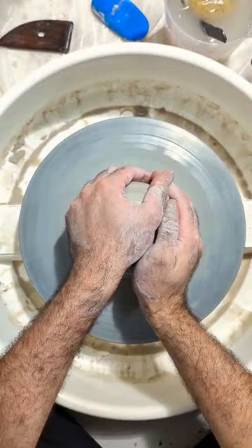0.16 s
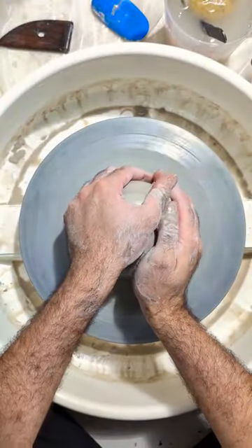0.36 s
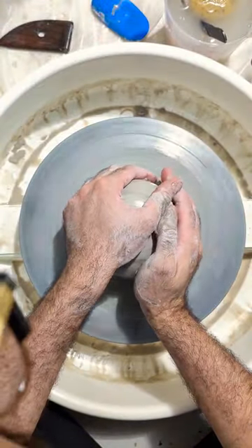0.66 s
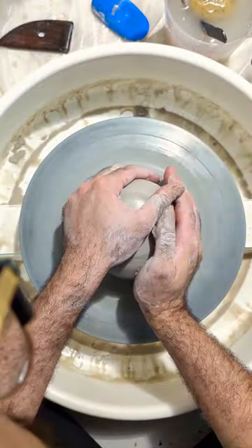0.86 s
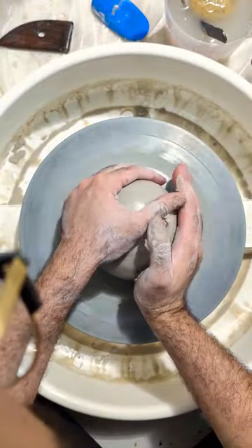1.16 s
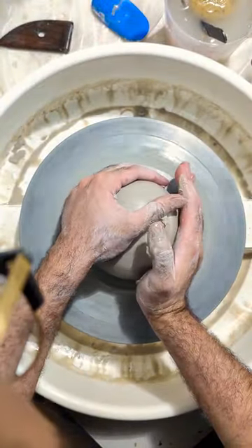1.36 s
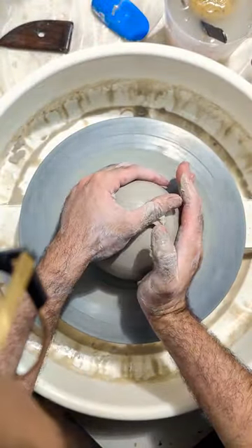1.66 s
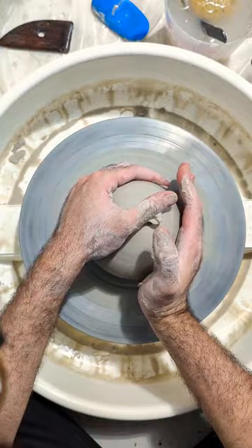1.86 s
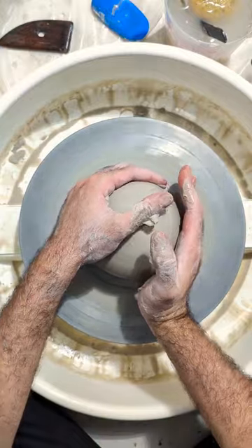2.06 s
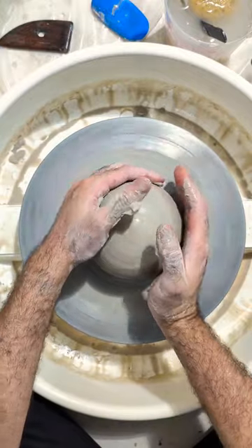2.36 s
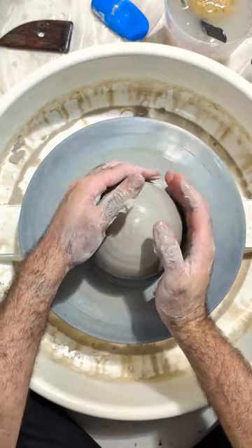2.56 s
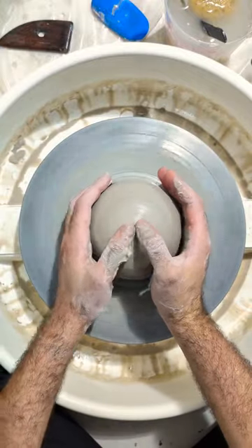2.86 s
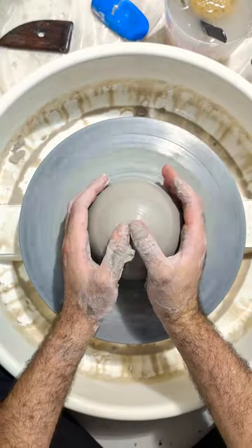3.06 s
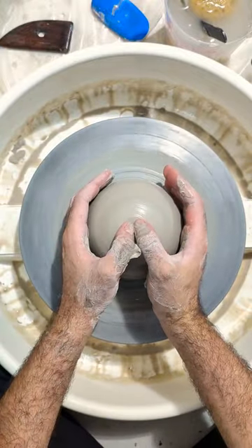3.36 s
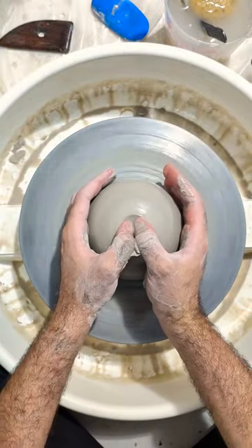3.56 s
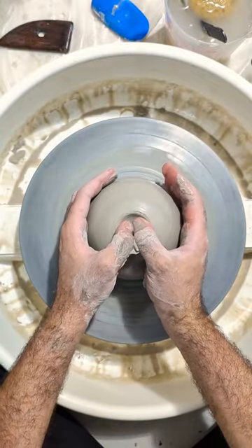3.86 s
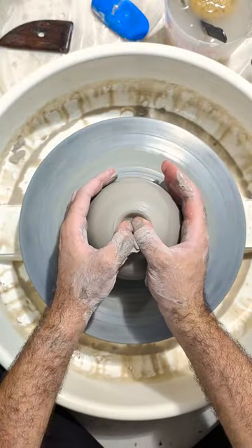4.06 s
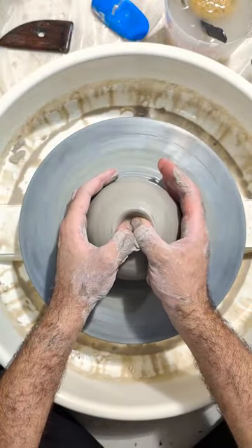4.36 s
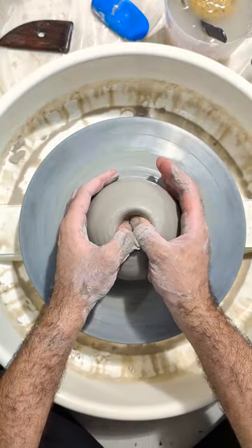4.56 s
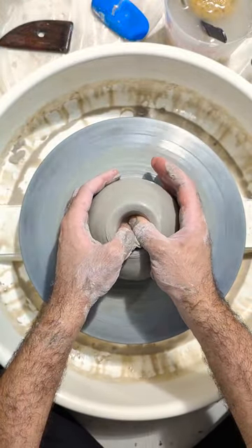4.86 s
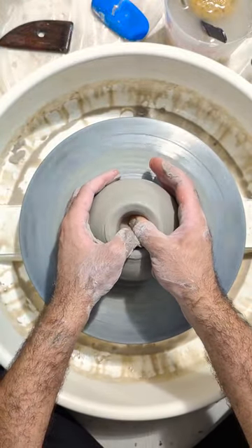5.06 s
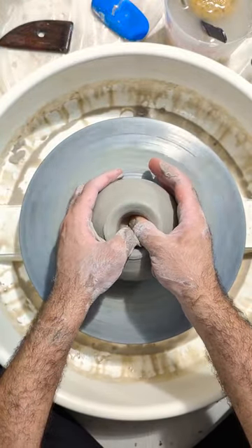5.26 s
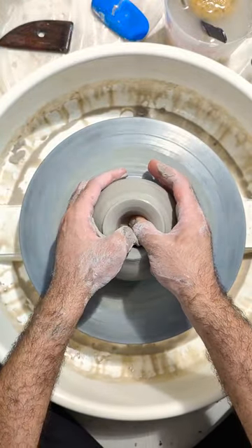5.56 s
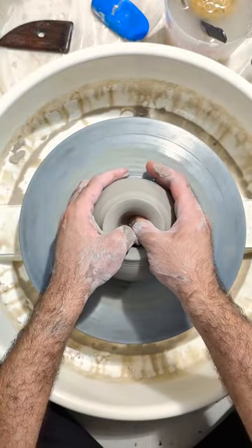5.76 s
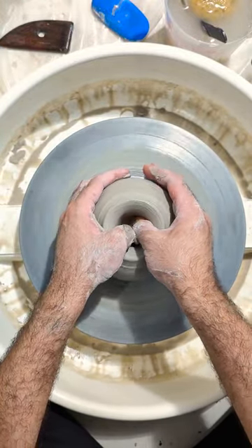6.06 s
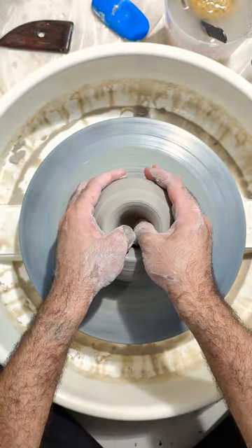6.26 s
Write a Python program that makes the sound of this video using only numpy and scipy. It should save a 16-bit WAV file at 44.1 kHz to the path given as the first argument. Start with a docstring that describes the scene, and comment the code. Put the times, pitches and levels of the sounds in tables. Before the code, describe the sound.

An electric pottery wheel spins up quickly and settles into a steady, nearly pure whine that sags and swells slightly as hands press the clay. A few small wet smacks come at the start. Close by, wet clay hisses faintly under the palms, pulsing with the turning wheel. Near the end the thumbs scrape and chatter softly, with a few more smacks. One microphone beside the wheel also hears a low studio rumble.

```python
"""Wet smacks of palms on clay come first, then an electric pottery wheel spins up and whines on one pitch,
sagging a little as the hands press and swelling as the pitch nears a resonance of its frame.
Close by, clay hisses under the palms and rings the metal wheel head, throbbing with the motor shaft.
Later the thumbs squeak and chatter. The sounds of the hands bounce around the splash pan, and
behind it all the one microphone hears the low rumble of the drive and the studio."""
import sys
import numpy as np
from scipy import signal
from scipy.fft import rfft, irfft
from scipy.io import wavfile
from scipy.ndimage import uniform_filter1d

SR = 44100
rng = np.random.default_rng(int(sys.argv[2]) if len(sys.argv) > 2 else 0)


def wav_record(signal):
    """Record a signal, one row per channel, as 16-bit PCM in the file named by sys.argv[1]."""
    frames = np.transpose(np.atleast_2d(signal))
    bounded = np.clip(frames, -1, 1)
    # unit amplitude maps onto the largest positive 16-bit level
    quanta = np.round(bounded * 32767).astype(np.int16)
    wavfile.write(sys.argv[1], SR, quanta)


N = 283298
TIME = np.arange(N) / SR
FREQ = np.fft.rfftfreq(N, 1 / SR)
SLOTS = 17  # armature slots: cycles of the whine per turn of the shaft
START_S, REACH_S = 0.288, 0.4  # the whine comes in; the wheel reaches working speed


# resonances of the frame near the whine: (f/Hz, width/Hz, tone level/dB)
FRAME_MODES = [(435.6, 15, -49), (330, 20, -59)]
# low tones of shaft and belt: (multiple of the shaft speed, level/dB re the median whine)
SHAFT_ORDERS = [(0.88, -14), (1.53, -24), (3.049, -20.5)]

def motor(turns, pitch_hz, third_db, flutter_db=0.63):
    """At the wheel, the armature slots sing one nearly pure tone; shaft and belt add weak low orders."""
    level_db = frame_swell(pitch_hz, FRAME_MODES, base_db=-62)
    slot_phase = 2 * np.pi * SLOTS * turns
    whine = np.sin(slot_phase) * amp(level_db + flutter_db * wander(33))
    third = np.sin(3 * slot_phase) * amp(third_db + 2 * wander(4.5))
    hum = shaft_tones(turns, SHAFT_ORDERS) * amp(np.median(level_db))
    running = np.clip(TIME / REACH_S, 0, 1) ** 4
    return np.sqrt(2) * (whine + running * third) + running * hum


# resonance of the frame that the octave meets at top speed: (f/Hz, width/Hz, tone level/dB)
UPPER_FRAME_MODE = [(889, 9, -76.5)]

def motor_octave(turns, pitch_hz, waver_db=3):
    """The weak, wavering second harmonic of the whine."""
    level_db = frame_swell(2 * pitch_hz, UPPER_FRAME_MODE, base_db=-97) + waver_db * wander(4.6)
    return np.sqrt(2) * amp(level_db) * np.sin(2 * np.pi * 2 * SLOTS * turns)


# pitch of the whine under the hands: (t/s, f/Hz)
WORKING_PITCH = [(0.44, 431.6), (0.6, 434.2), (0.72, 428.5), (1.08, 422.4), (1.87, 422.5), (2.2, 430.4),
                 (2.52, 440.8), (2.75, 442.3), (3.16, 438.2), (4.1, 435.7), (4.66, 428.9), (4.8, 433.7),
                 (4.96, 429.6), (5.8, 427.8), (6.1, 425.1), (6.4, 426)]

def motor_pitch(climb_hz_per_s=1100, round_s=0.012):
    """Pitch of the whine in Hz: an even climb that rounds into the working speed."""
    working_hz, = curves(WORKING_PITCH)
    shortfall_hz = climb_hz_per_s * round_s * np.logaddexp(0, (REACH_S - TIME) / round_s)
    return np.maximum(working_hz - shortfall_hz, working_hz / 2)


def frame_swell(tone_hz, modes, base_db, rise_s=0.028):
    """Level of a motor tone in dB: it swells as its pitch nears a resonance of the frame."""
    resonant = sum(amp(db) ** 2 / (1 + (2 * (tone_hz - hz) / width) ** 2) for hz, width, db in modes)
    onset = np.clip((TIME - START_S) / rise_s, .05, 1)
    return 10 * np.log10((amp(base_db) ** 2 + resonant) * onset ** 2)


# spells in which the drive turns harsh: (t/s, half length/s, third harmonic rise/dB, rattle rise/dB)
HARSH_SPELLS = [(0.598, 0.073, 7, 2.5), (2.26, 0.05, 16, -2.5), (2.657, 0.11, 14, 1.5),
                (2.934, 0.1, -3, 5.5), (5.125, 0.073, 12, 4.5), (5.636, 0.08, 14, 5),
                (5.833, 0.11, 12.5, 4)]

def strain(press_db, cold_db=10.5, settle_s=1.14):
    """Rattle and third harmonic in dB: starting and pressure lift the rattle, harsh spells move both."""
    settling = np.minimum(TIME / REACH_S, 1) ** 4 * np.exp(-np.maximum(TIME - REACH_S, 0) / settle_s)
    rattle_db = -77 + cold_db * settling + 0.14 * press_db
    third_db = -93
    for s, half_length, third_rise_db, rattle_rise_db in HARSH_SPELLS:
        spell = np.exp(-((TIME - s) / half_length) ** 2)
        rattle_db += rattle_rise_db * spell
        third_db += third_rise_db * spell
    return rattle_db, third_db


# modes of the housing, shaken by the bearings: (f/Hz, width/Hz, relative level/dB)
HOUSING_MODES = [(410, 620, -9.5), (456.3, 70, 6.5), (642, 130, 2), (801, 73, 1), (911, 164, 0),
                 (1107, 330, -15.5), (1424, 170, -13.5)]
# buzz around the octave of the whine: (multiple of the shaft speed, level/dB re the rattle)
BUZZ_ORDERS = [(32.7, -11.5), (33, -15), (34, -12), (35.5, -18.5)]

def bearings(turns, rattle_db, rolling_db=6, load_share=0.59):
    """Rolling noise and a buzz in the housing grow with the strain on the drive."""
    usual_db = np.median(rattle_db)
    load_db = load_share * (rattle_db - usual_db)
    rolling = ring(noise(), HOUSING_MODES) * amp(usual_db + rolling_db + load_db)
    buzz = shaft_tones(turns, BUZZ_ORDERS) * amp(rattle_db) * (TIME > START_S)
    return rolling + buzz


# hiss under the pressure of each grip, centring the clay and then opening it: (t/s, level/dB)
CENTRING_GRIP = [(0, -102), (0.35, -88.5), (0.89, -70.5), (0.98, -76.5), (1.2, -74.5), (1.29, -69),
                 (1.6, -67), (2.42, -73.5), (2.65, -67.5), (2.73, -80), (2.87, -93)]
OPENING_GRIP = [(2.94, -89.5), (3.03, -79), (3.6, -76), (3.9, -84.5), (5.23, -85.5), (5.31, -74.2),
                (6.04, -73.5), (6.16, -70), (6.25, -78.5), (6.42, -72.5)]

def hand_pressure(usual_hiss_db=-76.5):
    """Pressing harder lifts the hiss: its level, and its excess over ordinary pressure, both in dB."""
    hiss_db, = curves(list(CENTRING_GRIP) + list(OPENING_GRIP))
    return hiss_db, hiss_db - usual_hiss_db


# hiss of wet clay: (f/Hz, relative level/dB per Hz)
SLIP_SPECTRUM = [(300, 2), (1000, -2), (2200, -2.5), (3200, -0.5), (3600, -0.5), (5200, 1), (6300, -1),
                 (7400, -1.5), (8800, 1), (9600, -0.5), (10000, -3.5), (11500, -7), (13500, -11.5),
                 (15500, -16)]
# modes of the metal wheel head: (f/Hz, width/Hz, relative level/dB)
HEAD_MODES = [(2867, 250, -5.5), (3140, 130, -11), (3949, 78, -1), (4800, 150, -7.5), (5420, 62, -13.5),
              (5530, 140, -13.5), (6800, 55, -20), (8400, 130, -14.5), (8860, 330, -12), (9420, 220, -14.5),
              (9590, 170, -14.5), (11050, 80, -24.5)]
# ripple of the drive, shared out to hiss and ring: (multiple of the shaft speed, depth/dB)
DRIVE_RIPPLE = [(0.752, -3), (0.999, 1.5), (1.75, 1.4), (1.998, 1), (2.999, 1.5)]

def clay(turns, hiss_db, drag_db, hiss_throb=0.38, head_throb=0.89, catch_db=2):
    """Close on the palms: sliding hiss and the ring of the wheel head, both pulsing with the drive."""
    ripple_db = sum(db * np.sin(2 * np.pi * (k * turns + rng.random())) for k, db in DRIVE_RIPPLE)
    throb_db = ripple_db + catch_db * np.tanh(wander(9.1))  # the skin also catches at random
    fine_grains = grit(per_s=14000, spread_db=2.5) * amp(hiss_throb * throb_db)
    hiss = wet_film(colour(fine_grains, SLIP_SPECTRUM))
    coarse_grains = grit(per_s=9900, spread_db=8) * amp(head_throb * throb_db)
    return hiss * amp(hiss_db) + ring(coarse_grains, HEAD_MODES) * amp(drag_db)


def drag(press_db, usual_db=-80.5, grab_db=12.5, grab_s=0.081, loosen_s=0.62):
    """Ring of the wheel head in dB: the clay grabs the palms at first and loosens as the slip spreads."""
    start_db = grab_db * np.minimum(TIME / grab_s, 1) * np.exp(-(TIME / loosen_s) ** 2)
    grip_db = np.minimum(0.9 * press_db, 4)  # under firm pressure the skin slides on the slip
    uneven_db = -2.5 * wander(6.5)  # wetter and drier clay passes
    return usual_db + grip_db + start_db + uneven_db


def wet_film(hiss, depth_db=2, patch_cells=6):
    """The colour of the hiss shifts from moment to moment as the wet film breaks and closes."""
    cells = signal.stft(hiss, nperseg=256)[2]
    patches = uniform_filter1d(rng.standard_normal(cells.shape), patch_cells, axis=0)
    patches = unit(uniform_filter1d(patches, patch_cells, axis=1))
    return unit(signal.istft(cells * amp(depth_db * patches))[1][:N])


# wet smacks under the hands: (t/s, spray level/dB, decay/s, head ring/dB re spray, splat/dB re spray)
PALM_SMACKS = [(0.098, -67.5, 0.01, -11, -13), (0.117, -65, 0.0092, -17, 6), (0.154, -73.5, 0.035, -14, -9),
               (0.633, -64.5, 0.0059, -15, 6), (2.783, -77, 0.019, 4.5, -2), (3.015, -74, 0.011, -8, -13),
               (6.088, -74, 0.0097, 6, -5), (6.135, -67, 0.02, -1, -5), (6.195, -63, 0.0093, -18, -16)]
# bright spray and dull splat of a smack: (f/Hz, relative level/dB per Hz)
SPRAY_SPECTRUM = [(600, -42), (2000, -1.5), (4000, -1), (7200, -0.5), (9500, -4.5), (12000, -16),
                  (15000, -24)]
SPLAT_SPECTRUM = [(350, -19), (650, 3.5), (1000, 2), (1350, -1), (2200, -15), (5000, -34)]

def smacks(rise_s=0.003):
    """Short gritty bursts as a palm lets go of the wet clay or grips it again."""
    grains = grit(per_s=9000, spread_db=2)
    spray = colour(grains, SPRAY_SPECTRUM)
    head = ring(grains, HEAD_MODES)
    splat = colour(noise(), SPLAT_SPECTRUM)
    out = np.zeros(N)
    for s, db, decay_s, head_db, splat_db in PALM_SMACKS:
        burst = np.exp(-abs(TIME - s) / np.where(TIME < s, rise_s, decay_s))
        out += amp(db) * burst * (spray + amp(head_db) * head + amp(splat_db) * splat)
    return out


# ringing ticks: (t/s, f/Hz, peak level/dB, t60/s)
TICKS = [(0.1168, 3920, -59.5, 0.029), (0.116, 6900, -67, 0.006), (0.1205, 1370, -66, 0.027),
         (0.6305, 5580, -49, 0.012), (0.6339, 5330, -55, 0.014), (2.78, 2860, -68.5, 0.089)]

def ticks():
    """A bubble bursts in the slip or a finger touches the wheel head, ringing briefly on one pitch."""
    out = np.zeros(N)
    for s, hz, db, t60 in TICKS:
        age = np.maximum(TIME - s, 0)
        out += amp(db - 60 * age / t60) * np.sin(2 * np.pi * hz * age)
    return out


# chatter of the thumbs on drier clay: (t/s, level/dB)
CHATTER_LEVEL = [(3.8, -107), (4.65, -84.5), (5.23, -92), (5.29, -76), (6.0, -78), (6.14, -69),
                 (6.42, -84.5)]
# brightness of each scrape: (f/Hz, relative level/dB per Hz)
SCRAPE_SPECTRUM = [(2800, -11), (4000, -5.5), (4900, -3.5), (5600, 0.5), (8500, 1.5), (12000, -2.5)]

def thumb_chatter(turns, slips_per_turn=.75, spread_db=2, sharpness=1.5):
    """The thumbs stick and slip; each slip is a short scrape that rings the wheel head's high modes."""
    level_db, = curves(CHATTER_LEVEL)
    cycle = slips_per_turn * turns + 0.28 * wander(6.3)
    slips = np.exp(sharpness * np.cos(2 * np.pi * cycle)) * amp(spread_db * np.tanh(wander(7.8)))
    scrape = colour(grit(per_s=6000, spread_db=3) * slips, SCRAPE_SPECTRUM)
    return ring(scrape, HEAD_MODES) * amp(level_db) * (TIME > CHATTER_LEVEL[0][0])


# squeaks as the thumbs open the clay: (t/s, length/s, top f/Hz, level/dB)
SQUEAKS = [(4.083, 0.34, 10860, -91.5), (4.198, 0.2, 11800, -95)]

def thumb_squeak(start, length, top_hz, db, skew=0.8, arch=0.09, fade_db=12, flutter_db=4):
    """Wet skin sticks and slips: pitch and level rise and fall in one rough arch."""
    progress = np.linspace(0, 1, 30)
    drop = 1 - np.sin(np.pi * progress ** skew)
    rows = np.transpose([start + length * progress, top_hz * (1 - arch * drop), db - fade_db * drop])
    return whistle(rows, jitter=0.0083) * amp(flutter_db * wander(40))


def splash_pan(x, echo_db=-10, t60=0.051, count=60):
    """Quick reflections off the pan, the arms and the table follow the direct sound to the microphone."""
    delay_s = rng.uniform(.001, .035, count)
    taps = np.zeros(SR // 10)
    taps[(delay_s * SR).astype(int)] = rng.choice([-1, 1], count) * amp(-60 * delay_s / t60)
    taps *= amp(echo_db) / np.linalg.norm(taps)
    taps[0] = 1  # direct sound
    return signal.oaconvolve(x, taps / np.linalg.norm(taps))[:N]


# note of the idling drive: (t/s, f/Hz, level/dB)
IDLE_NOTE = [(0.0, 1040, -81), (0.15, 1035, -79), (0.31, 1036, -77), (0.37, 1040, -120)]

def idle_drive():
    """The drive whistles faintly before it gathers speed."""
    return whistle(IDLE_NOTE, jitter=0.016)


# room tone with the wheel on: (f/Hz, relative level/dB per Hz)
RUMBLE_SPECTRUM = [(10, -21), (22, 2), (42, 1.5), (60, -5), (82, -8.5), (115, -12), (155, -10), (205, -11),
                   (255, -20), (310, -15.5), (600, -23.5), (1200, -32.5), (2500, -44.5), (14000, -61.5)]

def studio_rumble(level_db=-57.5):
    """Behind the wheel's whine lies the steady low rumble of the drive and the studio."""
    return amp(level_db) * colour(noise(), RUMBLE_SPECTRUM)


def shaft_tones(turns, orders, waver_db=3.5):
    """Wavering tones locked to the shaft."""
    out = np.zeros(N)
    for multiple, db in orders:
        out += amp(db + waver_db * wander(2.9)) * np.sin(2 * np.pi * (multiple * turns + rng.random()))
    return np.sqrt(2) * out


def whistle(rows, jitter):
    """A thin tone along rows of (t/s, f/Hz, level/dB); its pitch strays by the share jitter."""
    hz, db = curves(rows)
    sounding = (TIME >= rows[0][0]) & (TIME < rows[-1][0])
    phase = 2 * np.pi * np.cumsum(hz * (1 + jitter * wander(200))) / SR
    return np.sqrt(2) * sounding * amp(db) * np.sin(phase)


def grit(per_s, spread_db):
    """Tiny clicks of uneven size: grains of clay passing under the skin."""
    size = amp(spread_db * np.minimum(rng.exponential(1, N), 4))
    return unit(np.sign(noise()) * size * (rng.random(N) < per_s / SR))


def ring(x, modes):
    """Passes x through steep resonances; each level sets that mode's share of the power."""
    response = sum(amp(db) / np.sqrt(width) / (1 + 2j * (FREQ - hz) / (1.42 * width)) ** 2
                   for hz, width, db in modes)
    return unit(irfft(rfft(x) * response, N))


def colour(x, spectrum):
    """Gives x a smooth spectrum, at an rms of one."""
    hz, db = np.transpose(spectrum)
    gain = amp(np.interp(np.log(FREQ + 1), np.log(hz), db))
    return unit(irfft(rfft(x) * gain, N))


def wander(rate_hz):
    """Slow random drift of rms one."""
    return unit(irfft(rfft(noise()) / (1 + (FREQ / rate_hz) ** 4), N))


def noise():
    """White noise."""
    return rng.standard_normal(N)


def curves(rows):
    """Each column after t/s as a curve in time."""
    s, *columns = np.transpose(rows)
    return [np.interp(TIME, s, column) for column in columns]


def amp(db):
    """Decibels to gain."""
    return 10 ** (np.asarray(db) / 20)


def unit(x):
    """Scales to an rms of one."""
    return x / np.sqrt(np.mean(x ** 2) + 1e-30)


def scene():
    """Mono, beside the wheel: one shaft drives whine, buzz and throb; hands set hiss, drag and strain."""
    pitch_hz = motor_pitch()
    hiss_db, press_db = hand_pressure()
    rattle_db, third_db = strain(press_db)
    jogged_hz = pitch_hz * (1 + 0.0023 * wander(12.4))  # lumps in the clay jog the speed
    turns = np.cumsum(jogged_hz) / SLOTS / SR
    whine = motor(turns, pitch_hz, third_db) + motor_octave(turns, pitch_hz)
    drive = whine + bearings(turns, rattle_db) + idle_drive()
    squeaks = sum(thumb_squeak(*row) for row in SQUEAKS)
    hands = clay(turns, hiss_db, drag(press_db)) + thumb_chatter(turns) + smacks() + ticks() + squeaks
    return (drive + splash_pan(hands) + studio_rumble())[None]


def record(dry):
    """The microphone feeds a recorder whose band ends at 15.6 kHz."""
    low_pass = signal.firwin(511, 15600, window=("kaiser", 9), fs=SR)
    return signal.oaconvolve(dry, low_pass[None], "same")


dry = scene()
out = record(dry)
wav_record(out)
```